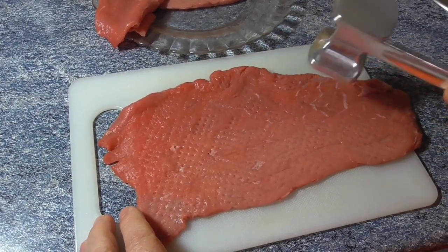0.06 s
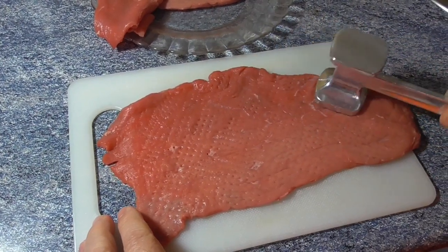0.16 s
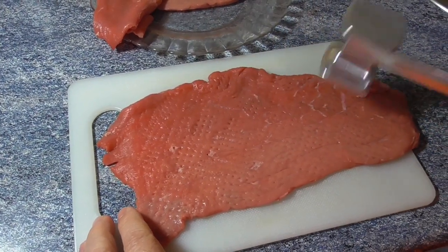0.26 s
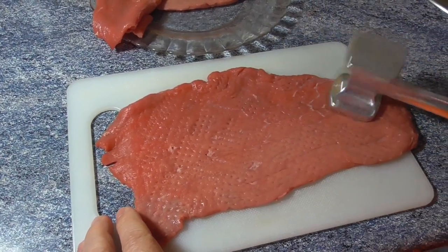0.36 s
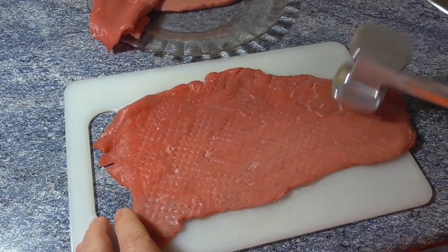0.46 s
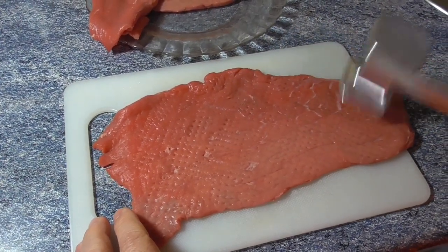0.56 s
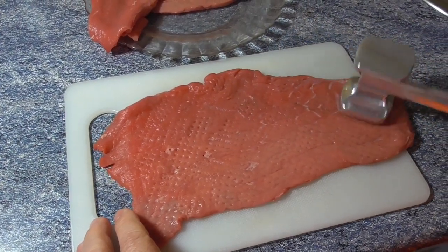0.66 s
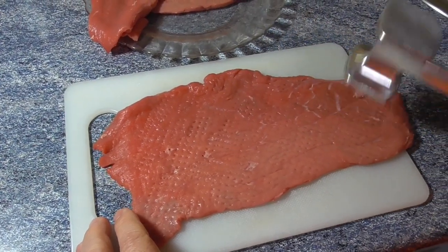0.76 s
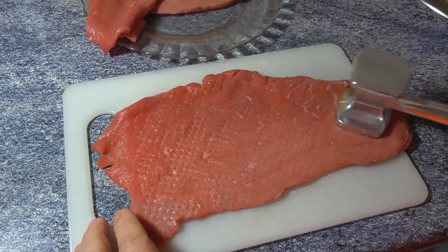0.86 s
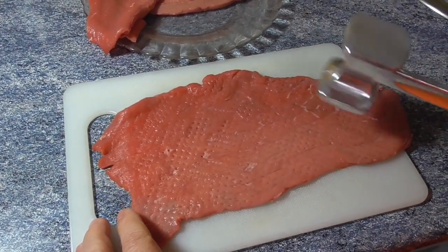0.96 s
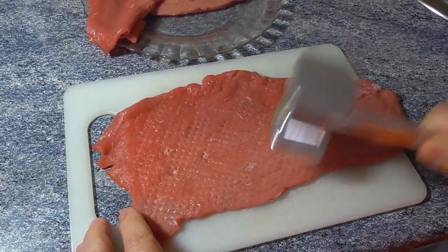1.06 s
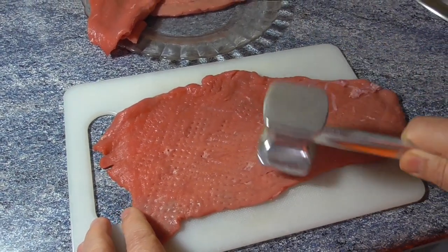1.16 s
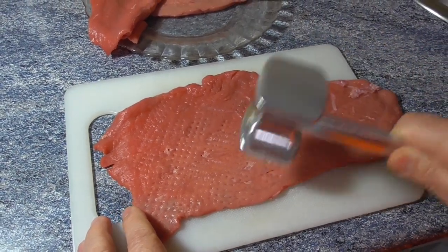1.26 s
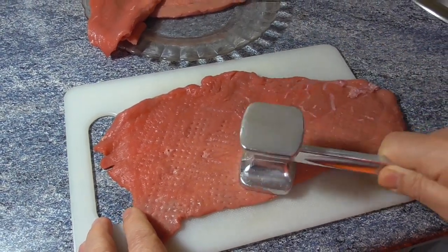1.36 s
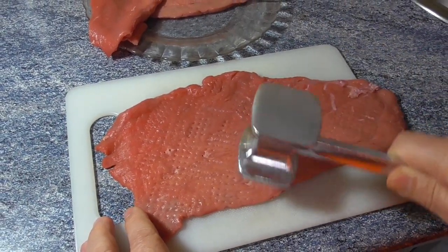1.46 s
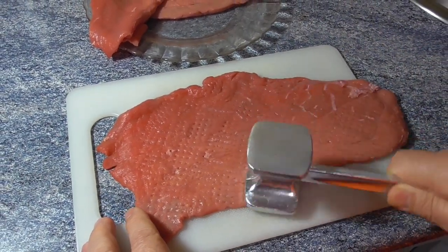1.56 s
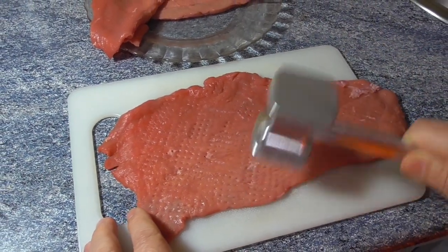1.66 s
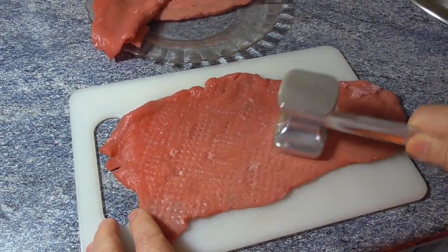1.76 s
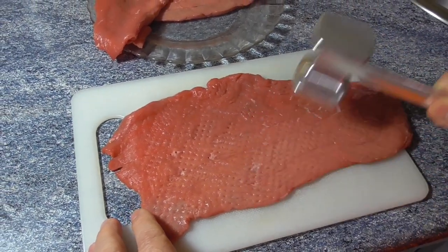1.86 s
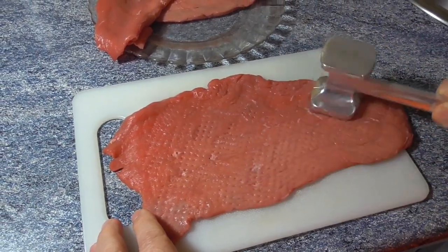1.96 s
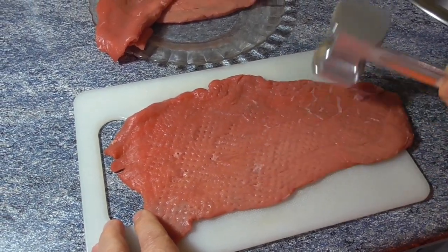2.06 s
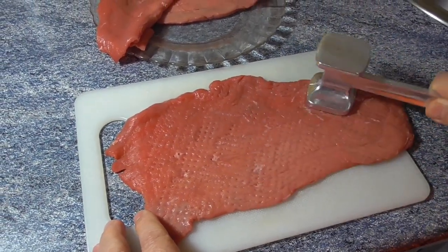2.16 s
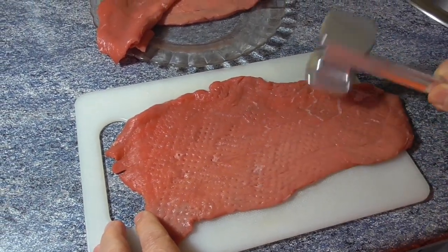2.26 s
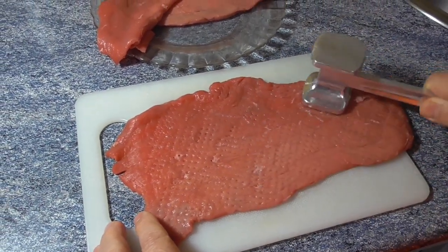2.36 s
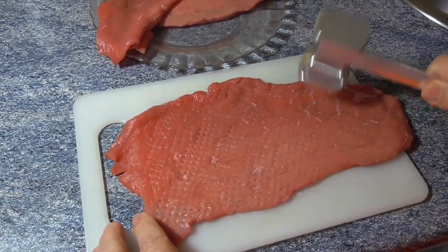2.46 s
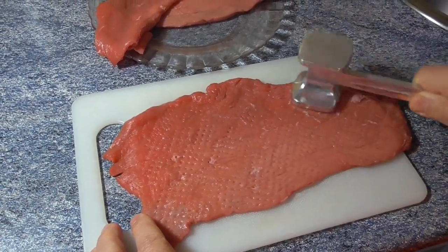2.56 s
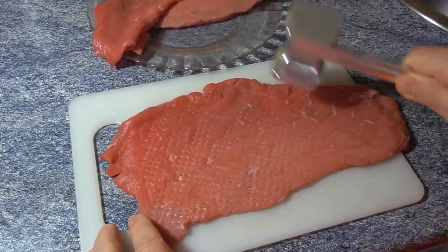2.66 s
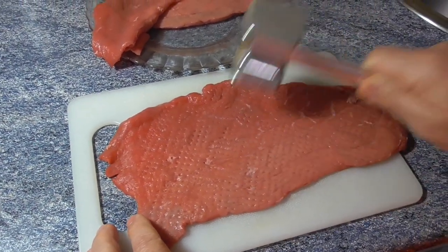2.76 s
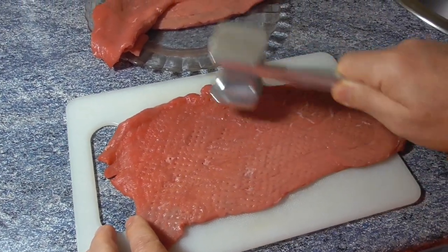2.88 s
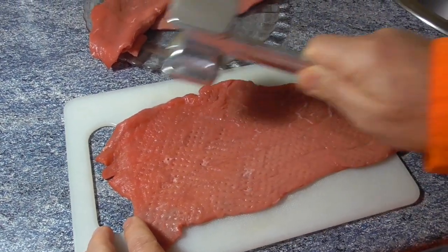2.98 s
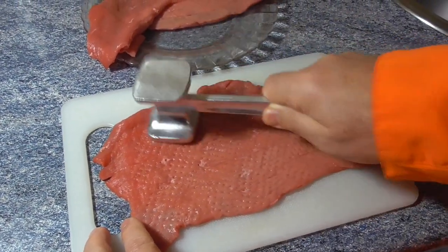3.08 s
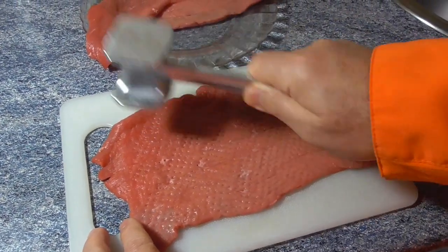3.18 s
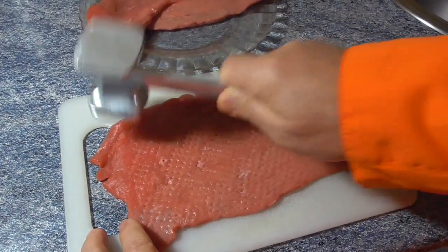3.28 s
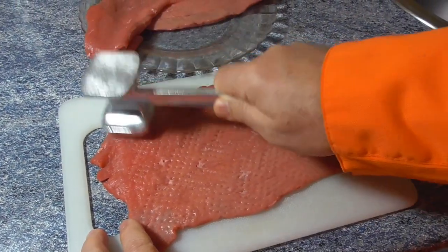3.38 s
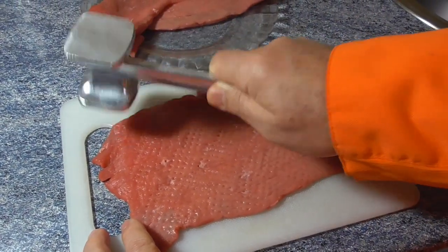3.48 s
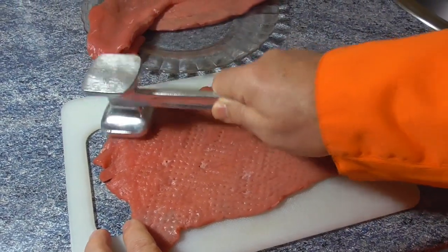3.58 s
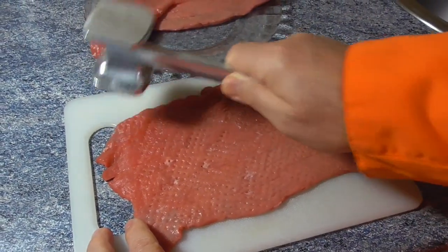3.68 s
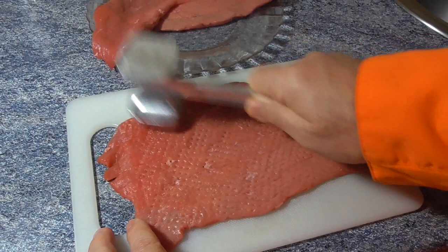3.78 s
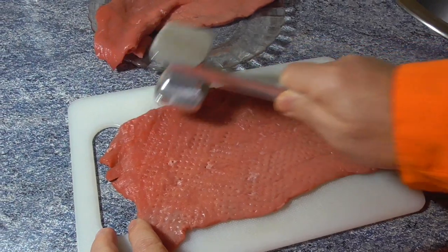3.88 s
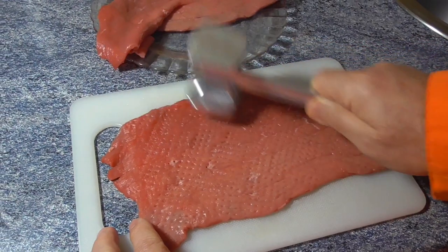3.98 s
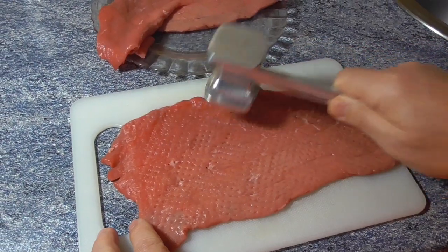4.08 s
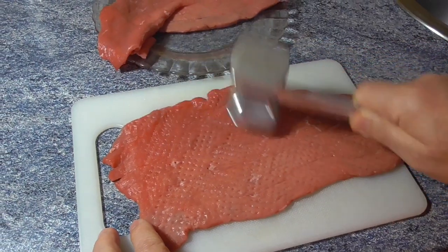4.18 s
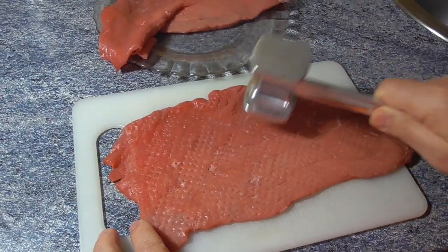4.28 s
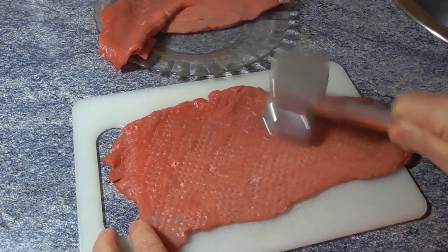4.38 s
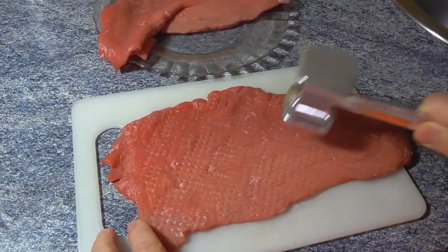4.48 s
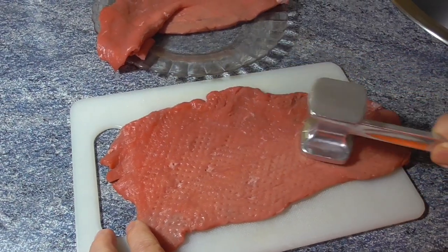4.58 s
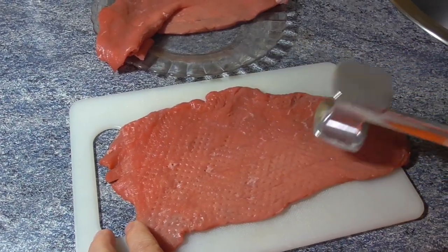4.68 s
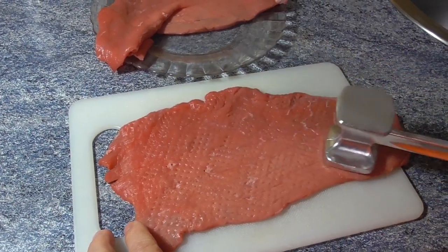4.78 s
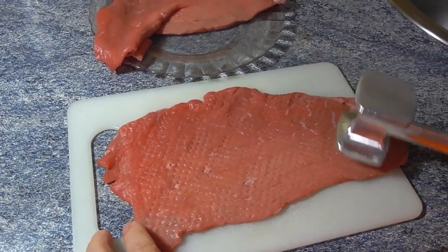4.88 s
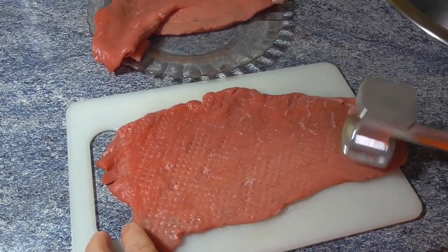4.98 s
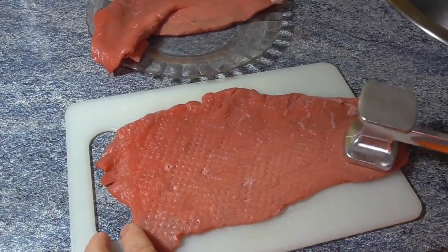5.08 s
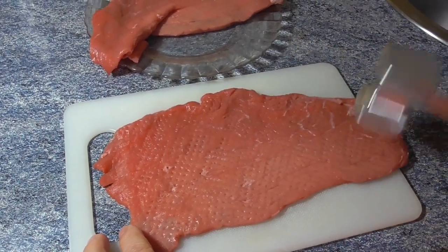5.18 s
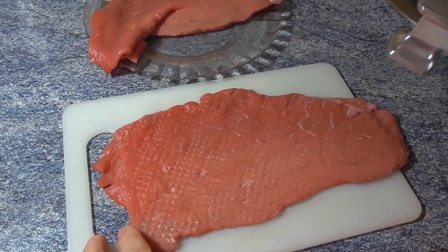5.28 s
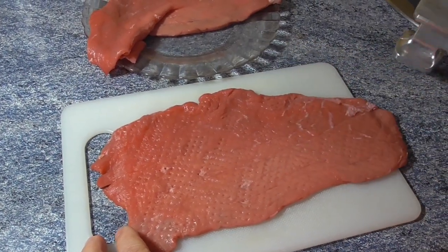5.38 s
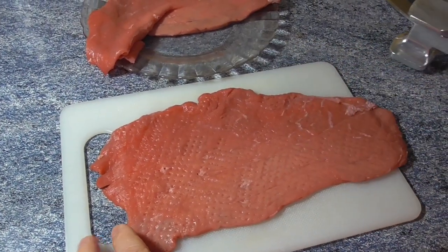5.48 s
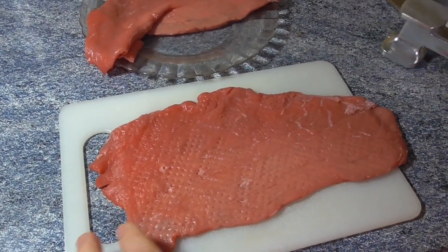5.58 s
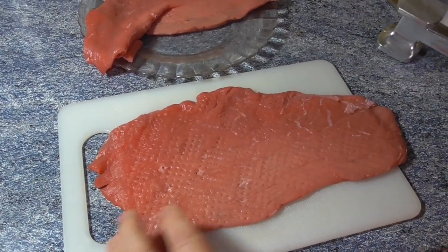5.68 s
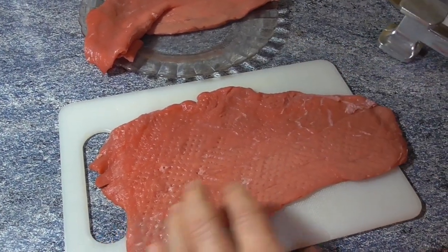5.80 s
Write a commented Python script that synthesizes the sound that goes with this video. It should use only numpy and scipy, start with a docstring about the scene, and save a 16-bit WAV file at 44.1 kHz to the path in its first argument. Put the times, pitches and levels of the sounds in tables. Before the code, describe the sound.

Close stereo pickup in a small hard kitchen: a metal mallet strikes a thin fillet on a plastic board at a brisk even pace, each hit a hollow thump with a sharp wet crack. After about five seconds it stops, a hand faintly brushes the meat, and the mallet is laid down with quick woody knocks and a small clink.

```python
"""On a hollow kitchen counter, a metal mallet pounds a thin fillet on a plastic board.
Blows are damped counter modes, an air pulse, filtered board noise and a shivering glass plate.
Slaps are short bursts of wet noise. At the end a hand brushes the meat and the mallet is laid down:
contact pulses excite the counter top's resonances, noise slides and skids, metal modes clink.
The small hard room answers with a diffuse tail, heard by a close pair of microphones."""
import sys
import numpy as np
from scipy import signal
from scipy.fft import rfft, irfft, next_fast_len
from scipy.io import wavfile
from scipy.ndimage import uniform_filter1d

SR = 44100
rng = np.random.default_rng(int(sys.argv[2]) if len(sys.argv) > 2 else 0)


def magnitude_from_level(level_db):
    """Linear magnitude for a level in decibels (20 dB per decade)."""
    exponent = np.asarray(level_db, float) / 20
    return 10 ** exponent


def transcribe(u):
    """Save the signal u as a 16-bit wav file named by the first command-line argument.

    u: samples, shape (n,) or (channels, n), limited to [-1, 1]; the rate is SR.
    q: integer samples, one column per channel.
    """
    v = np.clip(np.atleast_2d(u).T, -1, 1)
    q = np.round(v * 32767).astype(np.int16)
    wavfile.write(sys.argv[1], SR, q)


N = 257544
LEAD_IN = SR // 10  # spare samples for sounds that start before time 0

# Blows, coloured by where they land. Each row: first touch in seconds, then dB of thud at 130 Hz,
# boom at 310 Hz, knock at 700 Hz and clack at 1300 Hz.
BLOWS = [(-0.004, -20, -17.5, -26.5, -33.5), (0.204, -14.5, -8.5, -20, -23),
         (0.435, -12.5, -9.5, -18.5, -23), (0.652, -17.5, -15, -22, -29.5),
         (0.884, -14.5, -14.5, -23.5, -27), (1.177, -13, -17.5, -21, -23.5),
         (1.39, -12.5, -14.5, -15.5, -22.5), (1.593, -15, -18.5, -16.5, -23),
         (1.823, -15.5, -19, -31, -36.5), (2.014, -15.5, -8.5, -22, -20), (2.226, -16, -9.5, -18.5, -24),
         (2.426, -15, -6, -18.5, -21), (2.626, -14, -10, -16, -23.5), (2.883, -13, -17.5, -28.5, -19),
         (3.153, -15, -18.5, -37, -19.5), (3.398, -12, -18, -36, -27), (3.608, -26, -13.5, -10, -20.5),
         (3.871, -22.5, -48, -44, -38.5), (4.077, -14, -28.5, -32.5, -32.5), (4.27, -15, -15.5, -21, -19.5),
         (4.469, -15.5, -15.5, -26.5, -26.5), (4.651, -17, -14.5, -31.5, -31), (4.835, -18, -25, -40, -31),
         (4.986, -21, -19, -30, -28.5), (5.14, -15.5, -14.5, -22.5, -28.5)]
# Wet cracks of teeth on meat. Each row: start in seconds, level in dB, dull part at 2.5 kHz in relative dB,
# middle part at 4.7 kHz in relative dB, share thrown into the room in dB.
SLAPS = [(-0.0255, -8.5, -13.5, -5.5, -13), (0.2036, -15, -9.5, -7.5, -8.5),
         (0.434, -17.5, -10.5, -9.5, -9), (0.653, -15, -9.5, 2.5, -7), (0.7288, -41.5, -20, -6.5, -8),
         (0.885, -15.5, -5.5, -0.8, -7), (1.1778, -18.5, -6.5, -10, -8), (1.1813, -18.5, -6, -6, -18),
         (1.389, -15, -7.5, -11.5, -7), (1.5931, -16.5, -10, -12.5, -13.5),
         (1.825, -18.5, -16.5, -5.5, -12.5), (2.0144, -16.5, -23.5, -7.5, -7.5),
         (2.0194, -25, -1.5, -3, -2.5), (2.2268, -15.5, -17, -6, -6.5), (2.4272, -16.5, -13, -11, -8.5),
         (2.629, -19.5, -10, -8.5, -10.5), (2.6335, -22, -15, 2.5, -11.5),
         (2.8822, -19, -16.5, -23.5, -23.5), (2.8858, -14, -11.5, -9, -8.5),
         (3.1528, -12.5, -14.5, -7.5, -11.5), (3.3977, -22.5, -12, -8, -10.5), (3.6074, -15, -8, -1, -5.5),
         (3.8727, -33.5, -8.5, -1, -12), (4.0776, -23, -9.5, -10.5, -11), (4.2702, -13.5, -15, -10, -8.5),
         (4.4693, -19, -12, -10.5, 1), (4.4729, -15.5, -24.5, -9, -12), (4.6519, -16.5, -1, -1.5, -10),
         (4.8354, -15, 2.5, -6, -12), (4.9865, -14.5, 4, -2, -11), (5.1401, -15, -1.8, -5.5, -9)]
# Bounces of the mallet laid down. Each row: start in seconds, knock peak in dB,
# tick in dB re knock, metal ring in dB re knock.
BOUNCES = [(5.612, -2, -20, -24.5), (5.637, -11, -37, -44), (5.661, -5.5, -18, -14), (5.675, -13, -27, -36),
           (5.691, -5, -27, -61), (5.711, -16, -46, -14), (5.725, -12, -34, -27), (5.779, -31.5, 5, -30),
           (5.799, -20.5, -8, -25), (5.819, -17, -12.5, -36)]
# Counter and board modes. Each row: frequency in Hz, relative level in dB, t60 in seconds when ringing freely.
COUNTER_MODES = [(67.7, -34, .6), (120.5, -7.5, 0.87), (126.6, 6.5, 0.2), (155.1, -1, 0.22),
                 (207.4, -0.5, 0.11), (231.1, -1, 0.32), (257.2, -0.5, 0.15), (298.5, -3, 0.34),
                 (325, -3, 0.22), (374, -6.5, 0.15), (409, -11.5, 0.26), (455, -15, 0.42),
                 (534, -9.5, 0.14), (611.6, -13.5, 0.21), (682.5, -3.5, 0.073), (756.5, 0.5, 0.048),
                 (911, 5, 0.02), (1120, 3, 0.026), (1230, -16.5, 0.013), (1674, 1, 0.0089)]
# Glass plate modes. Each row: frequency in Hz, level in dB re clack, t60 in seconds.
PLATE_MODES = [(1268, -34, .9)]
# Mallet modes rung by each bounce. Each row: frequency in Hz, relative level in dB, t60 in seconds.
MALLET_MODES = [(3640, -19, .2), (5600, -32, .06), (7060, -28, .04), (10670, -30, .2), (12730, -26, .5)]
# Mallet head modes rung by the clink. Each row: frequency in Hz, relative level in dB, t60 in seconds.
HEAD_MODES = [(2300, 2.5, .01), (2700, 5, .01), (3586, -14, .12), (3644, -9, .17), (4323, -11, .06),
              (8177, -7, .57), (8823, -28, .13), (12070, -32, .5)]
# Bare counter top resonances. Each row: centre in Hz, width in Hz, relative level in dB.
TOP_RESONANCES = [(207, 36.3, 3), (317, 8.6, 8.5), (434, 55, 1.5), (643, 42, -6), (771, 37, 17.5),
                  (844, 39, 12.5), (900, 290, -19), (964, 65, 19.5), (1060, 81, -1.5), (1130, 50, 3),
                  (1225, 40, 12), (1380, 100, 7)]
# Wet meat spectrum. Each row: frequency in Hz, relative dB per Hz.
WET_SPECTRUM = [(880, -41.5), (1500, -9), (1640, -7.5), (2840, -4.5), (3880, -0.5), (6140, -9),
                (8290, -5.5), (12900, 1), (15300, -31), (16400, -39)]
# Board chatter spectrum. Each row: frequency in Hz, relative dB per Hz.
CHATTER_SPECTRUM = [(35, -41), (60, -35), (109, -51), (176, 19), (304, 3), (604, -2.5), (1000, 3),
                    (1400, 4), (1750, -23.5), (2500, -40.5), (3250, -84), (5500, -120)]
# Room tone spectrum. Each row: frequency in Hz, relative dB per Hz.
HUSH_SPECTRUM = [(18, -29.5), (30, -18.5), (124, 12), (174, -0.5), (336, 2.5), (584, -10.5), (1350, -11.5),
                 (1670, -27.5), (6550, -31), (12000, -25.5), (16000, -40)]
# A hand brushing the meat. Each row: time in seconds, level in dB.
BRUSH_LEVEL = [(5.42, -102), (5.474, -91), (5.484, -62), (5.5, -61), (5.51, -64.5), (5.6, -63)]
# Decay of the kitchen. Each row: frequency in Hz, t60 in seconds.
KITCHEN_T60 = [(60, 0.59), (160, 0.44), (420, 0.4), (1100, 0.34), (3000, 0.28), (8000, 0.27), (15000, 0.17)]
# Left-right likeness of diffuse sound. Each row: frequency in Hz, correlation.
ALIKE = [(100, 1), (400, 0.84), (2000, 0.32), (8000, 0.055)]
# Left lead of the direct sound. Each row: frequency in Hz, lead in radians.
LEFT_LEAD = [(130, 0), (300, 0.37), (1000, 0.5), (4000, 0.59), (8000, 0.78), (12000, 1.15)]
# Left minus right level of the direct sound. Each row: frequency in Hz, difference in dB.
BALANCE = [(100, 2), (300, -1.5), (10000, -1)]
# The head touches something hard and skids. One row: start in seconds, ring in dB, skid in dB.
CLINK = (5.7795, -20, -27)
# Spectrum of ticks and skid. Each row: frequency in Hz, relative dB per Hz.
SKID_SPECTRUM = [(120, -41), (200, -12), (620, -5), (748, -13), (1360, -22.5), (2200, -16.5), (2900, -26),
                 (3320, -21), (3620, -15), (5740, -29), (8370, -26.5), (12000, -33.5), (15600, -81),
                 (22000, -120)]
# How freely the board rings; it dies sooner while the mallet works near the hand that holds it.
# Each row: time in seconds, factor on ring length.
FREEDOM = [(0, 1), (.2, 0.76), (.7, 1), (1.6, 0.91), (2.5, .77), (2.9, 0.51), (3.15, 0.45), (3.4, 0.56),
           (3.6, .95), (3.85, 0.72), (4.25, 0.5), (4.8, 0.85), (5.2, 0.96)]
# Rough rubs on the counter top: the board jolted by a blow near its edge, then the settling mallet.
# Each row: start in seconds, length in seconds, level in dB, centre in Hz, width in Hz.
SLIDES = [(3.615, .09, -36, 750, 600), (5.7, .09, -33.5, 1300, 400)]


def unit(x):
    """Scaled to rms 1."""
    return x / np.sqrt(np.mean(x ** 2) + 1e-20)


def along(points, hz):
    """(Hz, value) points interpolated on a log frequency axis."""
    f, v = np.transpose(points)
    return np.interp(np.log(hz + 1), np.log(f + 1), v)


def decay(t, t60_s):
    """Exponential decay, 60 dB down at t60_s."""
    return magnitude_from_level(-60 * t / t60_s)


def filtered(x, response):
    """x times a complex response of frequency."""
    m = next_fast_len(x.shape[-1] + 4096)
    spectrum = rfft(x, m) * response(np.fft.rfftfreq(m, 1 / SR))
    return irfft(spectrum, m)[..., :x.shape[-1]]


def resonance(f, centre_hz, width_hz):
    """Complex response of one damped resonance, 1 at its centre."""
    return 1j * f * width_hz / (centre_hz ** 2 - f * f + 1j * f * width_hz)


def noise(n, spectrum, alike=((1, 1),)):
    """Stereo noise of rms 1; the mid-side mix sets the left-right likeness."""
    def mid_side(hz):
        turn = np.arccos(np.clip(along(alike, hz), -1, 1)) / 2
        return magnitude_from_level(along(spectrum, hz)) * [np.cos(turn), np.sin(turn)]

    mid, side = filtered(rng.standard_normal((2, n)), mid_side)
    return unit(np.array([mid + side, mid - side]))


def ring(modes, t):
    """Damped sines, each at a slightly new strength."""
    hz, db, t60_s = np.transpose(modes)[:, :, None]
    spread_db = 2.5 * rng.standard_normal(hz.shape)
    return (magnitude_from_level(db + spread_db - 60 * t / t60_s) * np.sin(2 * np.pi * hz * t)).sum(0)


def room(x, wet_db, thrown=None):
    """Direct sound plus a fresh diffuse tail (fed by x or thrown); each band dies at its own speed."""
    hz, t, z = signal.stft(noise(SR // 2, [(1, 0)], ALIKE), SR, nperseg=256)
    bands = z * decay(t, along(KITCHEN_T60, hz)[:, None])
    tail = signal.istft(bands, SR, nperseg=256)[1]
    tail_s = np.arange(tail.shape[1]) / SR
    tail = tail * np.clip((tail_s - .002) / 0.00048, 0, 1)  # first walls arrive late
    fed = x if thrown is None else thrown
    wet = signal.fftconvolve(fed[None], magnitude_from_level(wet_db) * tail / np.linalg.norm(tail[0]), axes=1)
    side = np.array([[.5], [-.5]])
    direct = filtered(x, lambda f: np.exp(1j * side * along(LEFT_LEAD, f)) * magnitude_from_level(side * along(BALANCE, f)))
    wet[:, :len(x)] += direct
    return wet


def silence():
    """Empty stereo track with room for tails."""
    return np.zeros((2, N + 2 * SR))


def add(track, s, sound):
    """Mix a sound in at s seconds."""
    i = round(s * SR) + LEAD_IN
    track[:, i:i + sound.shape[1]] += sound


def air_push(t, clack_db):
    """Pulse of squeezed-out air, positive then negative; harder clacks push more."""
    usual_push_db, db_per_clack_db, usual_clack_db = -2.5, 0.74, -22.5
    u = t / 0.00027
    return magnitude_from_level(usual_push_db + db_per_clack_db * (clack_db - usual_clack_db)) * u * (2 - u) * np.exp(-u)


def counter_body(t, colour, freedom):
    """Counter modes swing away first, just after the air has left."""
    modes = [(hz, db + along(colour, hz), t60_s * freedom) for hz, db, t60_s in COUNTER_MODES]
    late = np.maximum(t - .0005, 0)
    return -ring(modes, late) * (1 - np.exp(-late / 0.00097))


def board_chatter(t, colour, freedom):
    """Loose board: coloured noise with a soft onset and exponential decay."""
    tilt_db = [(200, -5.5), (600, 3)]
    rattle = filtered(noise(len(t), CHATTER_SPECTRUM)[0],
                      lambda f: magnitude_from_level(along(colour, f) + along(tilt_db, f)))
    return rattle * decay(t, 0.14 * freedom) * (1 - np.exp(-t / 0.00097))


def blows(t):
    """Once the meat is squeezed flat: air push, counter body, board chatter and glass plate together."""
    sink_s = 0.000922  # from first touch until the board is hit
    free_thrown_db, thrown_db_per_freedom = -3, 7
    out = silence()
    for s, thud_db, boom_db, knock_db, clack_db in BLOWS:
        freedom = np.interp(s, *np.transpose(FREEDOM))
        colour = [(130, thud_db), (310, boom_db), (700, knock_db), (1300, clack_db)]
        body = counter_body(t, colour, freedom)
        push = air_push(t, clack_db)
        chatter = board_chatter(t, colour, freedom)
        plate = ring(PLATE_MODES, t) * magnitude_from_level(clack_db)
        thrown = body * decay(t, 0.081) + push  # the walls mostly hear the first thump
        wet_db = free_thrown_db - thrown_db_per_freedom * (1 - freedom)  # less from a held board
        add(out, s + sink_s, room(body + push + chatter + plate, wet_db, thrown))
    return out


def slaps(t):
    """Wet noise bursts with a slower after-fizz; the walls get the evenly coloured crack."""
    fall_20db_s, airy_db = 0.0026, -13
    out = silence()
    shape = magnitude_from_level(-20 * t / fall_20db_s) + magnitude_from_level(-12.0 - 60 * t / 0.06)
    for s, db, dull_db, mid_db, wet_db in SLAPS:
        tilt_db = [(2500, dull_db), (4700, mid_db), (8000, 0), (12500, airy_db)]
        colour = lambda f: magnitude_from_level(along(WET_SPECTRUM, f) + along(tilt_db, f))
        burst = unit(filtered(rng.standard_normal(len(t)), colour)) * shape
        crack = filtered(1. * (np.arange(len(t)) == 40), colour)  # one filtered impulse
        crack = crack * np.linalg.norm(shape) / np.linalg.norm(crack)
        add(out, s, magnitude_from_level(db) * room(burst, wet_db, crack))
    return out


def bounces(t):
    """Contact pulses with rough noise excite the bare counter top; each also rings the mallet's metal."""
    out = silence()
    top = lambda f: sum(magnitude_from_level(db) * resonance(f, hz, width_hz) for hz, width_hz, db in TOP_RESONANCES)
    for s, db, tick_db, metal_db in BOUNCES:
        pulse = t / .00012 * np.exp(-t / 0.0003)
        rough = 0.089 * uniform_filter1d(rng.standard_normal(len(t)), size=9) * decay(t, 0.12)
        knock = filtered(pulse + rough, top)
        knock = knock / abs(knock).max()
        tick = noise(len(t), SKID_SPECTRUM)[0] * magnitude_from_level(tick_db - 60 * t / 0.026)
        thud = magnitude_from_level(-31.5) * ring(COUNTER_MODES[:5], t)  # the hollow below answers faintly
        add(out, s + .0008, room(magnitude_from_level(db) * (knock + tick - thud), wet_db=-5))
        add(out, s, room(magnitude_from_level(db + metal_db) * ring(MALLET_MODES, t), wet_db=-13))
    return out


def clink_and_skid(t):
    """The head's modes ring while a juddering noise skids and dies away."""
    out = silence()
    s, ring_db, skid_db = CLINK
    judder = np.interp(t, np.arange(0, 1, .003), rng.standard_normal(334))
    skid = magnitude_from_level(skid_db + 2.2 * judder - 60 * t / 0.41) * noise(len(t), SKID_SPECTRUM)[0]
    add(out, s, room(magnitude_from_level(ring_db) * ring(HEAD_MODES, t) + skid, wet_db=-10))
    return out


def slides():
    """Rubs: noise through one broad resonance twice over, swelling and fading."""
    edge_s = .03
    out = silence()
    for s, length_s, db, hz, width_hz in SLIDES:
        t = np.arange(round(length_s * SR)) / SR
        rub = unit(filtered(rng.standard_normal(len(t)), lambda f: resonance(f, hz, width_hz) ** 2))
        swell = np.clip(np.minimum(t, length_s - t) / edge_s, 0, 1)
        add(out, s, room(magnitude_from_level(db) * rub * swell, wet_db=-4.5))
    return out


def brushing():
    """A hand brushing the meat: wet-coloured noise under a level curve."""
    s, db = np.transpose(BRUSH_LEVEL)
    level_db = np.interp(np.arange(N) / SR, s, db, left=-120, right=-120)
    return magnitude_from_level(level_db) * noise(N, WET_SPECTRUM, ALIKE)


def room_tone():
    """Steady diffuse noise."""
    hush_db = -52.5
    return magnitude_from_level(hush_db) * noise(N, HUSH_SPECTRUM, ALIKE)


def scene():
    """Everything at the microphones."""
    t = np.arange(SR // 2) / SR
    hits = blows(t) + slaps(t[:SR // 10]) + bounces(t) + clink_and_skid(t) + slides()
    return hits[:, LEAD_IN:LEAD_IN + N] + brushing() + room_tone()


def band_limit(x):
    """A steep low-pass at the top of the band."""
    return signal.sosfilt(signal.butter(12, 16520, fs=SR, output="sos"), x)


def record(dry):
    """The microphones lose the deep bass (four first-order cuts) and clip softly near full scale."""
    cut_hz = 85.8
    cut = filtered(dry, lambda f: (1j * f / (cut_hz + 1j * f)) ** 4)
    mix = cut / (1 + abs(cut) ** 6) ** (1 / 6)
    return band_limit(mix)


dry = scene()
out = record(dry)
transcribe(out)
```